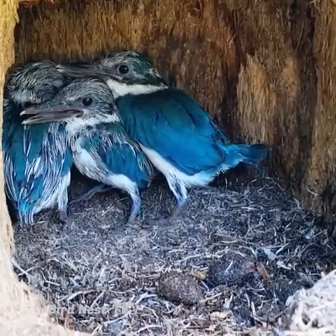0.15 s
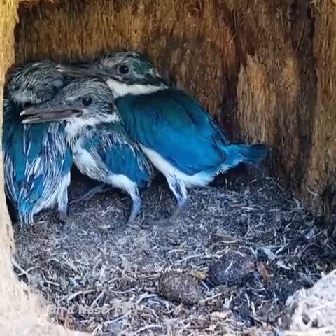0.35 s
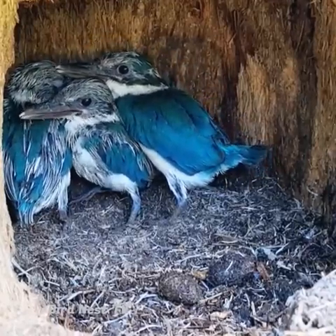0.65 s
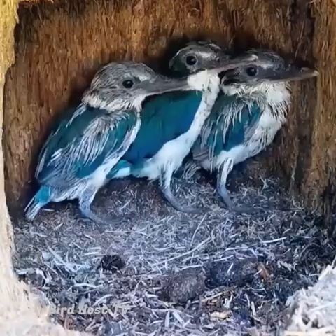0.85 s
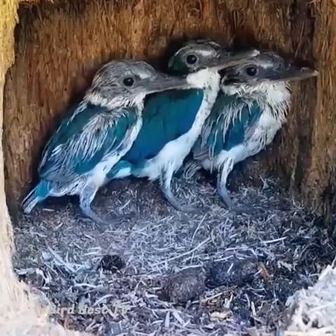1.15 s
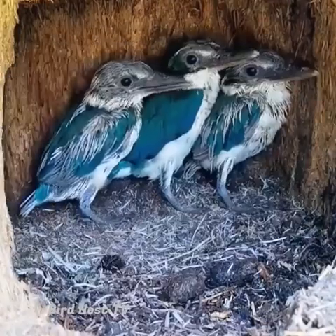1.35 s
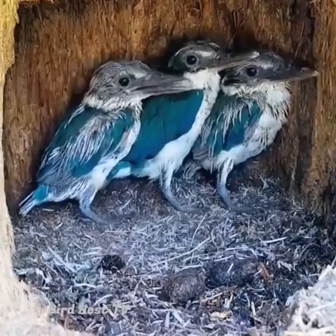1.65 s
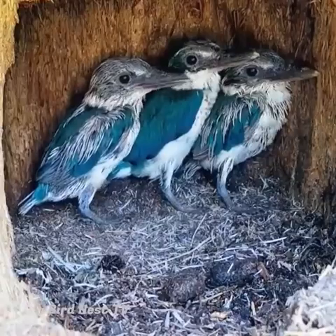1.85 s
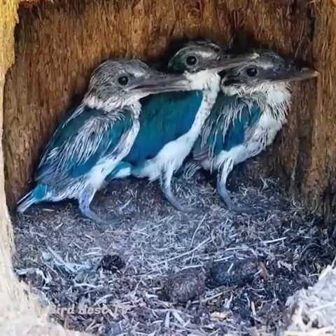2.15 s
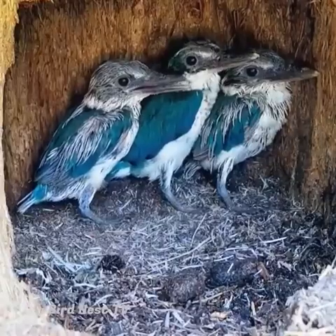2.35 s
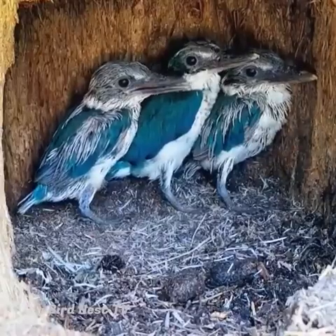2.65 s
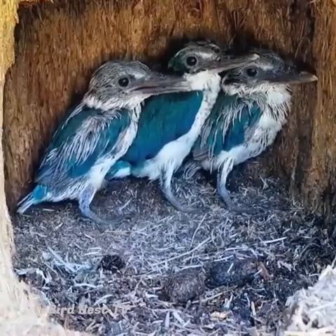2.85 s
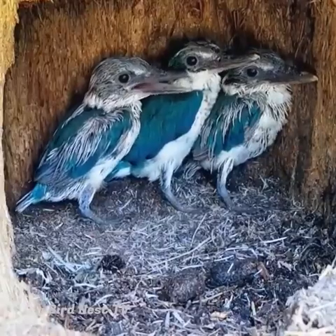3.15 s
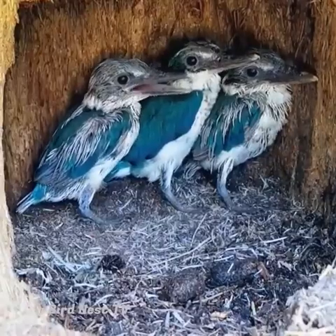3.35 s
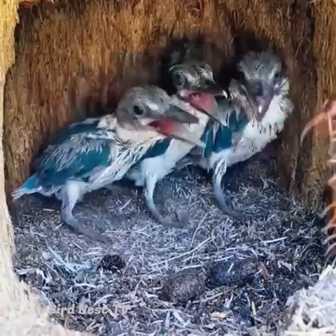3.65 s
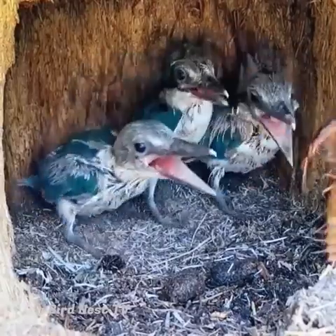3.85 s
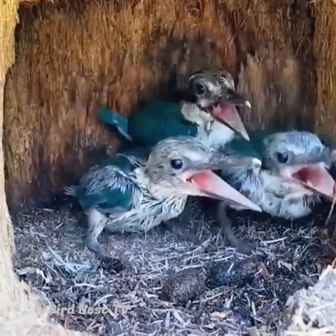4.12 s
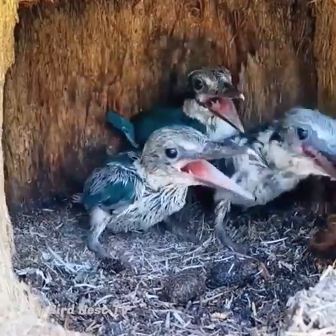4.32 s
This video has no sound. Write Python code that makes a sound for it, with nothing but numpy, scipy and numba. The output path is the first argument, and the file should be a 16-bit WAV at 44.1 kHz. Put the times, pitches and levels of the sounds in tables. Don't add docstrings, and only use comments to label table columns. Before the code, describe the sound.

Begging nestlings heard very close in a small wooden cavity. Rough throaty rasps come first, then a squeak and a gap filled by insect shimmer and wind. Scattered croaks and nasal falling squeaks return, with light taps. At about three seconds they burst into loud, piercing, overlapping shrieks, with two sharp wood knocks and a dull thud as the parent arrives with food.

```python
import sys
import numpy as np
from scipy import signal
from scipy.fft import rfft, irfft
from scipy.io import wavfile
from scipy.ndimage import uniform_filter1d
from numba import njit

SR = 44100
rng = np.random.default_rng(int(sys.argv[2]) if len(sys.argv) > 2 else 0)


def level_to_linear(level):
    exponent = np.asarray(level, float) / 20
    return 10 ** exponent


def generate_wav(sig):
    pcm = np.round(np.clip(np.atleast_2d(sig).T, -1, 1) * 32767).astype(np.int16)
    wavfile.write(sys.argv[1], SR, pcm)


N = 197646

MOVES_S = [.77, .78, 3.45, 3.8]


def rms_one(x):
    return x / np.sqrt(np.mean(x ** 2) + 1e-20)


def evened(y):
    return y / np.sqrt(uniform_filter1d(y ** 2, size=3000) + 1e-12)


def in_time(rows):
    s, *columns = np.transpose(rows)
    return [np.interp(np.arange(N) / SR, s, c) for c in columns]


def drift(rate):
    r = np.exp(-2 * np.pi * rate / SR)
    noise = rng.standard_normal(N + SR)
    return rms_one(signal.lfilter([1], [1, -2 * r, r * r], noise)[SR:])


def sides(pan_db):
    return level_to_linear(np.array([[.5], [-.5]]) * pan_db)


def two_sided(left, other, alike):
    return np.array([left, alike * left + np.sqrt(1 - alike ** 2) * other])


def coloured(spectrum, alike):
    hz, points = np.fft.rfftfreq(N, 1 / SR) + 1, np.array(spectrum)
    shape_db = np.interp(np.log(hz), np.log(points[:, 0]), points[:, 1], left=-90, right=-90)
    left, other = irfft(rfft(rng.standard_normal((2, N))) * level_to_linear(shape_db), N)
    return rms_one(two_sided(left, other, alike))


def bouts(rows, attack, release):
    t = np.arange(N) / SR
    gains = []
    for s, length, first, last, *_ in rows:
        times = [s - attack, s, s + length, s + length + release]
        levels_db = [first - 30, first, last, last - 30]
        gains.append(level_to_linear(np.interp(t, times, levels_db, left=-150, right=-150)))
    return np.array(gains)


def blend(gains, values):
    return sum(g ** 2 * v for g, v in zip(gains, values)) / sum(g ** 2 for g in gains)


def bumps(rows, t):
    return sum(height * np.exp(-((t - s) / half) ** 2) for s, height, half in rows)


@njit
def resonate(x, cosine, r):
    y = np.zeros(len(x))
    for i in range(2, len(x)):
        y[i] = x[i] - .5 * x[i - 2] + 2 * r[i] * cosine[i] * y[i - 1] - r[i] * r[i] * y[i - 2]
    return y


def tract(x, hz, width, skirt_db):
    cosine = np.cos(2 * np.pi * hz / SR)
    r = np.exp(-np.pi * np.clip(width, 150, 4000) / SR) + 0 * hz
    once = resonate(x, cosine, r)
    twice = resonate(once, cosine, r)
    return evened(evened(twice) + level_to_linear(skirt_db) * evened(once))


def syrinx():
    pulses_per_s, puff_decay_s = 290, 0.0056
    turns = np.cumsum(pulses_per_s * level_to_linear(3.0 * drift(150))) / SR
    pulses = np.diff(np.floor(turns), prepend=0) * level_to_linear(1.9 * rng.standard_normal(N))
    puffs = signal.lfilter([1], [1, -np.exp(-1 / (puff_decay_s * SR))], pulses) + 1.7
    return rms_one(pulses), rms_one(puffs * rng.standard_normal(N))


def surges():
    # time in seconds, push (or catch, if negative) in dB, half length in seconds.
    push_rows = [(0.103, -5, .0015), (0.116, -4, .0015), (.145, -7, .0015), (0.151, -6.5, .0012),
                 (0.152, -1, 0.0029), (.163, -5, 0.0014), (0.177, -5, .0015), (.207, -4.5, 0.0017),
                 (0.231, -6.5, .002), (0.26, -8, .0015), (0.267, -6.5, .0015), (0.286, -4, 0.0014),
                 (.333, -5, .0015), (1.534, -5, .004), (1.956, -6, .003), (1.974, 3, .004), (2.2, -4, .006),
                 (2.26, -5, .004), (2.419, -2, .004), (0.191, -3, 0.0051), (0.211, -7, 0.0034),
                 (0.223, 6, 0.0055), (0.245, -2, 0.0015), (0.248, 2.5, 0.0056), (0.277, -4, 0.0023),
                 (0.293, 5, .004), (0.311, -4.5, 0.0089), (0.324, 1.5, 0.003), (0.342, 0.5, 0.0019),
                 (0.346, 1, 0.0017), (0.358, -10, 0.0045), (1.171, -7, .006), (1.338, 2.5, 0.013),
                 (1.377, -1.5, .003), (1.396, -2.5, 0.0057), (1.438, 4, 0.01), (1.464, 3.5, 0.0056),
                 (1.475, -7.5, 0.011), (1.544, 7.5, 0.0039), (1.559, 2, 0.0044), (1.585, 8, 0.0033),
                 (1.724, 8.5, 0.0042), (1.732, -16.5, 0.011), (1.758, -3.5, 0.0039), (1.775, -14, 0.0043),
                 (2.138, 8.5, 0.016), (2.146, -4, 0.0032), (2.213, -3, 0.0044), (3.062, -14, 0.0033),
                 (3.26, 1, 0.0039), (3.287, -7, 0.0065), (3.385, -7, .003), (3.428, -10, 0.0052)]
    flutter_db, grain_db = 1.6, 1.8
    pushes_db = bumps(push_rows, np.arange(N) / SR)
    return level_to_linear(pushes_db + flutter_db * drift(76) + grain_db * drift(170))


def squeak_courses():
    # time in seconds, upper voice in Hz, upper voice in dB.
    arch = [(.364, 912, -40), (.376, 936, -23.5), (.4, 975, -20), (.418, 975, -20), (.468, 931, -29.5),
            (.494, 869, -39), (.512, 860, -62)]
    # start in seconds, length in seconds, first Hz, settled Hz, upper voice in dB.
    falling = [
        (1.787, 0.18, 1148, 954, -20),
        (2.048, 0.085, 1106, 1008, -31),
        (2.167, 0.036, 1092, 985, -31.5),
        (2.273, 0.094, 1140, 1055, -35.5),
        (2.88, 0.1616, 1201, 1019, -19),
        (3.652, 0.097, 1311, 1096, -32),
        (3.78, .2, 1232, 1150, -38.5),
    ]
    # time in seconds, pitch change as a share, level in dB,
    # half length in seconds.
    breaks = [(1.87, -.015, 0, .015), (1.905, .035, 0, .025), (2.1, -.02, 0, .015), (2.13, .06, 3, .018),
              (2.195, -.04, -4, .012), (2.3, -.03, -3, .012), (2.335, .06, 1, .018), (2.375, -.03, 0, .012),
              (2.985, -.015, 0, .015), (3.004, .05, 0, .013), (3.71, .035, 0, .02), (3.745, -.05, 0, .015),
              (3.85, 0, -14, .015)]
    settle_s, attack_s, release_s = 0.055, 0.019, 0.0045
    swell_db, swell_s = 0.5, 0.0085
    t = np.arange(N) / SR
    hz, db = in_time(arch)
    start, end = arch[0][0], arch[-1][0]
    courses = [(hz, level_to_linear(db) * (t > start) * (t < end), np.clip((t - start) / (end - start), 0, 1))]
    share = bumps([(at, up, half) for at, up, _, half in breaks], t)
    lift_db = bumps([(at, lift, half) for at, _, lift, half in breaks], t)
    for s, length, first, settled, db in falling:
        age = np.clip(t - s, -attack_s, length)
        pitch = settled + (first - settled) * np.exp(-age / settle_s)
        gain = bouts([(s, length, db, db)], attack_s, release_s)[0]
        gain = gain * level_to_linear(swell_db * np.exp(-np.abs(age) / swell_s) + lift_db)
        courses.append((pitch * (1 + share), gain, np.clip(age / length, 0, 1)))
    return courses


def rasps():
    # start in seconds, length in seconds, first level in dB, last level in dB,
    # gape (mouth above throat) in dB.
    chatter_rows = [(0.0, 0.039, -18, -35.5, 5.5), (0.033, 0.04, -41.5, -42.5, 7.5),
                    (0.087, 0.12, -30.5, -27, 6.5), (0.224, 0.063, -33, -31, 11.5),
                    (0.326, 0.017, -30.5, -33.5, 9), (0.494, 0.03, -51, -55.5, 10),
                    (1.142, 0.061, -42.5, -38, 2), (1.222, 0.063, -32, -34.5, 2.5),
                    (1.306, 0.17, -29, -33.5, 0.5), (1.534, 0.04, -39.5, -28.5, 1),
                    (1.586, 0.043, -42, -59, 4), (1.706, 0.015, -49, -31, 1.5),
                    (1.754, 0.03, -33.5, -29, 11.5), (1.764, 0.17, -41, -27, -13),
                    (1.972, 0.2, -24.5, -37, 1), (2.169, 0.028, -30.5, -37.5, -1),
                    (2.214, 0.17, -31, -40.5, 2), (2.424, 0.037, -40, -36, -1),
                    (3.052, 0.15, -27.5, -24.5, 0.5), (3.212, 0.13, -24, -27.5, 0),
                    (3.366, 0.049, -19, -25, -1.5), (3.443, 0.13, -25, -29.5, -1),
                    (3.618, 0.45, -38.5, -34.5, -1), (4.022, 0.33, -42, -31, -6)]
    # time in seconds, effort in dB, shrill pitch in Hz, mouth above shrill in dB,
    # spread in dB (several shrieks at once widen the shrill band).
    chorus_rows = [(3.05, -27, 4850, -3, 1), (3.09, -23, 5900, -3, -6.5), (3.14, -33.5, 6160, -5, -2),
                   (3.22, -28, 6500, -25, -4), (3.34, -37, 5900, 5, 4), (3.39, -17, 5400, -4, 3.5),
                   (3.47, -22.5, 5670, -1, 4.5), (3.49, -16, 5900, -7.5, 5), (3.6, -19, 5470, 5, -1.5),
                   (3.66, -20.5, 4780, 4.5, 1), (3.77, -18.5, 5470, 0, 0), (3.88, -17, 6400, -4, 5),
                   (4.14, -19.5, 6370, -7, 5.5), (4.22, -19, 5700, -3.5, 0), (4.36, -19.5, 5660, -3.5, 4),
                   (4.43, -17, 5530, -2, -5.5), (4.456, -19.5, 5060, 0.5, 3), (4.48, -23.5, 4900, 3.5, 2.5)]
    # time in seconds, throat in Hz, mouth in Hz.
    tract_rows = [(0.0, 1750, 3560), (.2, 1765, 3740), (.33, 2000, 4090), (1.14, 1620, 2800),
                  (1.17, 1610, 4420), (1.24, 1540, 4200), (1.36, 1600, 3560), (1.5, 1340, 3640),
                  (1.72, 1340, 4250), (2.1, 1267, 3710), (2.36, 1250, 3850), (3.07, 1360, 4080),
                  (3.19, 1430, 3800), (3.28, 1240, 3660), (3.41, 1480, 4150), (3.49, 1425, 4080),
                  (3.7, 1290, 4150), (3.85, 1580, 4650), (4.48, 1522, 4370)]
    # width in Hz, left-right likeness (0-1), share of noise (0-1),
    # skirt in dB.
    resonances = [
        (1240, 0.78, 0.35, -26.5),
        (1235, 0.72, 1, -8),
        (1813, 0.25, 0.62, -25),
    ]
    # frequency in Hz, level in dB.
    breath_colour = [(7400, -56), (8000, 10.5), (9000, 8), (10400, 1.5), (10800, -2.5), (13000, 0),
                     (15000, -11.5), (16200, -11)]
    # time in seconds, breath heard in dB, left-right in dB.
    facing = [(0, 7.5, 8), (.3, 11, 4.5), (.45, -10, 2.5), (1.15, 7, 0), (1.45, 10, 5.5), (1.58, 11.5, -1),
              (1.75, -0.5, -8.5), (1.95, 0, -1), (2.05, -8.5, 3), (2.4, 6.5, -1.5), (2.9, 0.5, -6.5),
              (3.1, -1, 4), (3.5, 3.5, 2), (3.9, 2.5, 1), (4.48, -1.5, 4)]
    # shrill in dB, breath in dB, throat damping in dB, mouth damping in dB, mouth left-right in dB,
    # shrill left-right in dB.
    chatter_voice = (0.5, -21.5, -5, 1.5, 4, 3)
    squeak_voice = (-3.5, -18, 12, -6, -0.5, 9.5)
    chorus_voice = (3, -10, -9, 3, 0.5, 8)
    voices = np.transpose([chatter_voice, squeak_voice, chorus_voice])
    shrill_db, breath_db, throat_damp, mouth_damp, mouth_pan, shrill_pan = voices
    chatter_shrill_hz, squeak_shrill_hz = 5900, 5050

    chatter_bouts = bouts(chatter_rows, attack=0.029, release=0.033) * surges()
    gaping = level_to_linear(np.array(chatter_rows)[:, 4]) @ chatter_bouts + 1e-6
    chatter = chatter_bouts.sum(axis=0) + 1e-6
    pitches, gains, places = zip(*squeak_courses())
    squeak = sum(gains) + 1e-9
    pitch = sum(g * v for g, v in zip(gains, pitches)) / squeak
    place = sum(g * v for g, v in zip(gains, places)) / squeak
    effort_db, shriek_hz, gape_db, spread_db = in_time(chorus_rows)
    chorus = level_to_linear(effort_db) * (np.arange(N) > chorus_rows[0][0] * SR)

    throat_hz, mouth_hz = in_time(tract_rows)
    sinking_hz = 3567 + 870 * np.exp(-place / 0.2) + 390 * place ** 3
    squeak_mouth_hz = np.where(gains[0] > 0, 4150, sinking_hz)
    squeak_mouth = squeak * (squeak / level_to_linear(-20.5)) ** 0.1 * level_to_linear(0.5)

    throat_levels = [chatter, squeak * level_to_linear(-9), chorus * level_to_linear(-16)]
    mouth_levels = [gaping, squeak_mouth, chorus * level_to_linear(gape_db)]
    shrill_levels = np.array([np.sqrt(chatter * gaping), squeak, chorus]) * level_to_linear(shrill_db)[:, None]
    levels = [throat_levels, mouth_levels, shrill_levels]
    centres = [[throat_hz, pitch, throat_hz], [mouth_hz, squeak_mouth_hz, mouth_hz],
               [chatter_shrill_hz, squeak_shrill_hz, shriek_hz]]
    damps = [throat_damp, mouth_damp, [0, 0, spread_db]]
    pans = [0 * mouth_pan, mouth_pan, shrill_pan]
    narrow = [(chatter / gaping) ** 0.15, 1, 1]

    squeak_breath = squeak * (squeak / level_to_linear(-25.0)) ** 1.14 * level_to_linear(-5.0 * place ** 2)
    chorus_breath = chorus * level_to_linear(2 * (shriek_hz - chatter_shrill_hz) / 1e3)
    breath = level_to_linear(breath_db) @ [chatter, squeak_breath, chorus_breath]
    facing_db, side_db = in_time(facing)
    air = breath * level_to_linear(facing_db + 1.7 * drift(64)) * coloured(breath_colour, alike=0.16)

    near, far = syrinx(), syrinx()
    out = 0
    for parts, hz, damp_db, pan, (width, alike, noisy, skirt_db) in zip(levels, centres, damps, pans, resonances):
        centre = blend(parts, hz)
        width = width * blend(parts, [level_to_linear(db) * n for db, n in zip(damp_db, narrow)])
        left, other = (tract((1 - noisy) * pulses + noisy * puffs, centre, width, skirt_db)
                       for pulses, puffs in (near, far))
        level = np.sqrt(sum(g ** 2 for g in parts))
        out = out + level * sides(blend(parts, pan) + side_db) * two_sided(left, other, alike)
    out = air + signal.sosfilt(signal.cheby1(8, 1, 7603, fs=SR, output="sos"), out)
    return signal.sosfilt(signal.butter(4, 480, "high", fs=SR, output="sos"), out)


def squeaks():
    # multiple of the common beat, level under the upper voice in dB.
    mixing = [(4, -21), (6, -19), (7, -21), (8, -18), (9, -23), (10, -21), (11, -23), (12, -24), (13, -23),
              (14, -23), (15, -20), (16, -20), (17, -16), (18, -13), (19, -14), (20, -12), (21, -16)]
    # level in dB, one per squeak.
    lower_levels = [-9.5, -10.5, -15.5, -32, -40, -13.5, 2.5, -2.5]
    unsteadiness = [.005, .009, .012, .024, .024, .007, .007, .008]
    out, waver, flutter = np.zeros(N), drift(40), drift(27)
    wobble = [drift(40) for _ in mixing]
    phases = rng.uniform(0, 2 * np.pi, len(mixing))
    for (hz, gain, place), unsteady, lower_db in zip(squeak_courses(), unsteadiness, lower_levels):
        on = gain > 1e-5
        beat = 2 * np.pi * np.cumsum((hz * (1 + unsteady * waver))[on]) / SR / 5
        lower = level_to_linear(lower_db - 4.5 * np.sin(np.pi * place[on]))
        upper = level_to_linear(-8 * np.exp(-place[on] / .12))
        tone = upper * np.sin(5 * beat) + lower * np.sin(3 * beat)
        for (multiple, db), own, phase in zip(mixing, wobble, phases):
            tone += level_to_linear(db + 2 * own[on]) * np.sin(multiple * beat + phase)
        out[on] += gain[on] * level_to_linear(3 + 200 * unsteady * flutter[on]) * tone
    return out * sides(7.1)


def whistles():
    # time in seconds, pitch in Hz, level in dB.
    paths = [
        [(1.778, 4517, -40), (1.79, 4320, -30), (1.83, 3807, -26), (1.87, 3570, -36), (1.91, 3680, -27),
         (1.96, 3850, -31)],
        [(2.866, 4650, -47), (2.876, 4520, -24.5), (2.892, 3910, -21.5), (2.93, 3690, -24), (2.985, 3750, -21),
         (3.01, 4080, -24.5), (3.045, 4100, -31)],
        [(3.625, 4340, -34), (3.64, 4050, -21.5), (3.66, 3800, -20), (3.7, 3890, -24)],
        [(3.47, 5680, -38), (3.5, 5950, -34), (3.58, 5830, -28), (3.62, 5340, -26)],
        [(4.19, 5985, -41), (4.23, 5900, -27.5), (4.33, 5870, -16), (4.4, 5630, -28), (4.445, 5510, -40)],
        [(.225, 3900, -43), (.26, 3946, -16.5), (.29, 3994, -38), (.312, 3900, -42), (.326, 3950, -16),
         (.345, 3900, -26), (.355, 4050, -47)],
        [(1.295, 1764, -43), (1.33, 1650, -32.5), (1.38, 1608, -32.5), (1.435, 1600, -35), (1.445, 1190, -31),
         (1.47, 1080, -38)],
    ]
    unsteadiness = [.01, .008, .01, .03, .03, .025, .06]
    out, waver, flicker, t = np.zeros(N), drift(90), drift(60), np.arange(N) / SR
    for rows, unsteady in zip(paths, unsteadiness):
        on = (t > rows[0][0]) & (t < rows[-1][0])
        hz, db = in_time(rows)
        phase = 2 * np.pi * np.cumsum(hz * (1 + unsteady * waver)) / SR
        out[on] += (level_to_linear(db + 3 + 2.5 * flicker) * np.sin(phase))[on]
    return out * surges() ** 0.63 * sides(5.2)


def ports(x):
    # frequency in Hz, level in dB.
    shade = [(600, -4), (2000, 7.5), (4500, 0.5), (6500, -10.5), (8000, -53), (16000, -58)]
    # frequency in Hz, then the lead in radians when huddled, when lined up,
    # and at the entrance.
    lead_rows = [(0, 0, 0, 0), (1000, .4, .4, .4), (1800, 0, .4, .8), (2300, .6, 3, 2.3),
                 (3000, 1.6, 1.5, 2.9), (3500, 2.2, 2, 3.1), (4100, 1.8, 1.6, 3.2), (4700, 3.1, 1, 1.2),
                 (5300, 4, 0, 0), (5900, 5.2, -1, -1), (6500, 6.5, 1, 1), (7300, 8, 2.5, 2.3)]
    hz, t = np.fft.rfftfreq(N, 1 / SR), np.arange(N) / SR
    spectrum = rfft(x[1]) * level_to_linear(np.interp(hz, *np.transpose(shade)))
    place = np.interp(t, MOVES_S, [0.0054, 1.046, 1, 1.79])
    at_hz, *leads = np.transpose(lead_rows)
    right = np.zeros(N)
    for k, lead in enumerate(leads):
        turned = irfft(spectrum * np.exp(-1j * np.interp(hz, at_hz, lead)), N)
        right += np.sqrt(np.clip(1 - abs(place - k), 0, 1)) * turned
    return np.array([x[0], right])


def knocks():
    # time in seconds, peak in dB, left-right in dB.
    knock_rows = [
        (0.766, -37.5, 5),
        (1.721, -39, -13),
        (1.753, -45, -3),
        (3.389, -2, 1.5),
        (3.768, -4.5, -4),
    ]
    out, age = np.zeros((2, N + 2000)), np.arange(2000) / SR
    for s, db, pan in knock_rows:
        first = round(s * SR)
        crack = rng.standard_normal((2, 2000)) * level_to_linear(db + 1.0 - 60 * age / 0.025)
        out[:, first:first + 2000] += crack * sides(pan)
    return signal.sosfilt(signal.butter(2, [700, 7000], "band", fs=SR, output="sos"), out[:, :N])


def thump():
    # time in seconds, peak in dB, first pitch in Hz, decay in seconds.
    s, db, hz, decay = (3.692, -22.5, 122, 0.045)
    # start in seconds, length in seconds, first level in dB, last level in dB.
    scuff_rows = [
        (3.66, .012, -36, -38),
        (3.695, .014, -33, -36),
    ]
    age = np.clip(np.arange(N) / SR - s, 0, None)
    blow = level_to_linear(db - 30 * age / decay) * np.sin(2 * np.pi * hz * age * (1 - 4 * age))
    bark = coloured([(230, -10), (320, 0), (480, -3), (600, -20)], alike=.6)
    scuffs = bouts(scuff_rows, attack=.015, release=.02).sum(axis=0) * bark
    return blow * sides(-8) + scuffs * sides(-5)


def wings():
    # start in seconds, length in seconds, first level in dB, last level in dB, pitch in Hz.
    hum = (3.5, 0.13, -47, -46, 186.5)
    gain = bouts([hum], attack=0.03, release=.03)[0]
    phase = 2 * np.pi * np.cumsum(hum[4] * (1 + .015 * drift(30))) / SR
    return np.sqrt(2) * gain * np.sin(phase) * sides(-3.0)


def strokes(throb_per_s):
    first_s, length_s, top_hz, sag_hz_per_s = .6842, .0085, 7300, 110000
    count, age = np.divmod(np.arange(N) / SR - first_s + 30 / throb_per_s, 1 / (3 * throb_per_s))
    k = count.astype(int)
    luck = rng.standard_normal((k.max() + 1, 4))[k].T
    strength = level_to_linear(np.array([-6, 2, 3])[k % 3] + 1.5 * luck[0])
    shape = np.sin(np.pi * np.clip(age / length_s, 0, 1)) ** 2 * strength
    turns = (top_hz + 70 * luck[1] - sag_hz_per_s * age / 2) * age
    return 2 * shape * np.sin(2 * np.pi * (turns + luck[2:]))


def insects():
    # time in seconds, level in dB.
    swarm_rows = [(0, -59.5), (.77, -39), (.78, -49), (1.2, -40), (2.5, -47.5), (2.75, -45), (3.0, -39),
                  (4.48, -78)]
    # start in seconds, length in seconds, first level in dB, last level in dB.
    singer_rows = [
        (0, 0.772, -35, -35),
        (.79, 0.91, -44.5, -66),
        (1.2, 0.85, -44.5, -54),
        (2.5, 0.21, -40.5, -39),
    ]
    throb_per_s = 33.5
    t = np.arange(N) / SR
    turn, clear = 2 * np.pi * throb_per_s * t, t < MOVES_S[0]
    depth = np.where(clear, 1, .35)
    throb = 1 + .7 * depth * np.sin(turn + np.where(clear, 4.17, 1))
    throb = throb * (1 + .65 * depth * np.sin(3 * turn + .42))
    swarm = coloured([(5000, -19.0), (5600, -10.0), (5800, -1.0), (6300, 10.0), (6700, 3), (7300, -6.5),
                      (7550, 0.0)], alike=0.042)
    singer = coloured([(5700, -18.0), (6000, -24.0), (6500, -18.5), (6950, -2.0), (7250, -19.0), (7600, -21.5),
                       (8100, -24.5), (8600, -32.0)], alike=0.1)
    later = coloured([(6600, -30.0), (6850, -2.5), (7100, 1.5), (7400, -13.0), (7700, -25.0), (8400, -28.5),
                      (12500, -41.0)], alike=0.3)
    swarm_db = in_time(swarm_rows)[0] + 0.5 * drift(6.7) + 4 * np.sin(turn + 2.6) * clear + 2 * drift(60)
    song_gain = bouts(singer_rows, attack=0.14, release=0.015).sum(axis=0)
    song = np.where(clear, strokes(throb_per_s) + .45 * throb * singer, throb * later)
    return (level_to_linear(swarm_db) * swarm + song_gain * song) * sides(10.4)


def rumble():
    # frequency in Hz, level in dB.
    colour = [(18, -38), (30, -13), (50, -5), (85, 6), (140, -1), (250, -3), (420, -10.5), (600, -31),
              (900, -30)]
    # time in seconds, level in dB.
    floor_rows = [(0, -41.5), (.77, -42.5), (.8, -46), (3.6, -45), (3.8, -52.5), (4.48, -57.5)]
    # start in seconds, length in seconds, first level in dB, last level in dB.
    gust_rows = [(0, 0.013, -44, -59), (.13, 0.053, -43, -43), (.4, 0.082, -47, -48),
                 (.68, 0.039, -66, -52), (1.42, 0.085, -53, -50.5), (1.78, 0.51, -52, -50),
                 (2.53, 0.013, -60, -73), (2.76, 0.11, -84, -45), (3.3, 0.49, -47.5, -75),
                 (3.67, 0.036, -31.5, -23.5), (4.0, 0.023, -46, -46)]
    wind = level_to_linear(in_time(floor_rows)[0]) + bouts(gust_rows, attack=0.041, release=0.056).sum(axis=0)
    return wind * level_to_linear(2.0 * drift(8)) * coloured(colour, alike=0.3) * sides(-7.5)


def hiss():
    # frequency in Hz, level in dB.
    colour = [(500, -4), (1000, -12), (5500, -10), (8500, -16), (13200, -25), (13500, -11), (15500, -11),
              (15900, -22)]
    return level_to_linear(-53.5) * coloured(colour, alike=0.019)


def thinned_out(x, under_db, spread_db):
    # time in seconds, centre in Hz, half width in Hz.
    cancel_rows = [(.07, 4720, 230), (.15, 4720, 230), (.17, 4720, 0), (.19, 4720, 230), (.29, 4720, 230),
                   (.3, 4700, 0), (3.8, 3050, 0), (3.93, 3100, 170), (4.02, 3150, 200), (4.09, 3100, 340),
                   (4.095, 3300, 300), (4.105, 3720, 620), (4.22, 3650, 600), (4.27, 3400, 560),
                   (4.39, 3250, 450), (4.4, 2950, 150)]
    middle_side = np.array([x[0] + x[1], x[0] - x[1]]) / 2
    hz, t, cells = signal.stft(middle_side, SR, nperseg=2048)
    line_hz, band_hz = hz[:1024, None], hz[4:1024:8, None]
    power = abs(cells[:, :1024]) ** 2
    band = power.reshape(2, 128, 8, -1).mean(axis=2)
    mask = uniform_filter1d(band.max(axis=0), size=13, axis=0)
    luck = np.repeat(rng.exponential(1, band.shape), 2, axis=2)[..., :band.shape[2]]
    lost = band < mask * level_to_linear(2 * (under_db + spread_db * luck))
    lost |= band < band[::-1] * level_to_linear(2 * (luck - 10))
    treble = abs(band_hz - 10700) < 2650
    wide = np.repeat(uniform_filter1d(band, size=3)[:, ::4], 4, axis=1)
    wide_luck = np.repeat(luck[:, ::4], 4, axis=1)
    lost |= treble & (wide < level_to_linear(2 * (5 * wide_luck - 101)))
    s, centre, half = np.transpose(cancel_rows)
    lost[0] |= abs(band_hz - np.interp(t, s, centre)) < np.interp(t, s, half, left=0)
    weak = power < np.repeat(band, 8, axis=1) * np.where(line_hz > 8000, 1.25, .95)
    gone = weak | np.repeat(lost, 8, axis=1)
    cells[:, :1024] *= 1 - gone * (line_hz > 1300)
    mid, side = signal.istft(cells, SR, nperseg=2048)[1][:, :N]
    return np.array([mid + side, mid - side])


def scene():
    birds = ports(rasps() + squeaks() + whistles())
    return birds + knocks() + thump() + wings() + insects() + rumble() + hiss()


def band_limit(x):
    return signal.sosfilt(signal.butter(12, 15990, fs=SR, output="sos"), x)


def record(dry):
    # frequency in Hz, width in Hz, depth in dB.
    dip_rows = [(7950, 150, -8), (10600, 250, -10)]
    hz = np.fft.rfftfreq(N, 1 / SR)
    dips_db = bumps([(centre, db, width) for centre, width, db in dip_rows], hz)
    dipped = irfft(rfft(dry) * level_to_linear(dips_db) * (hz < 15850), N)
    rounded = .54 * np.tanh(dipped / .54)
    return band_limit(thinned_out(rounded, under_db=-14, spread_db=4))


dry = scene()
out = record(dry)
generate_wav(out)
```